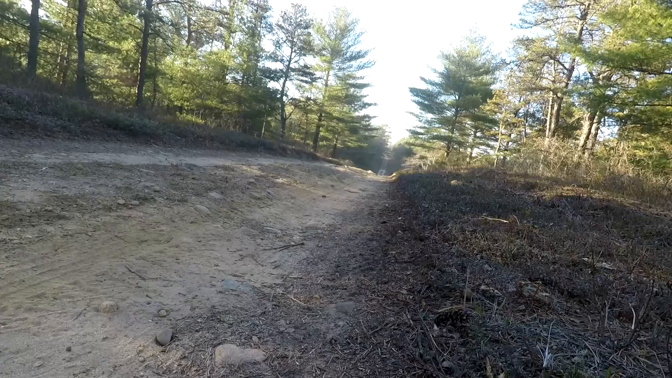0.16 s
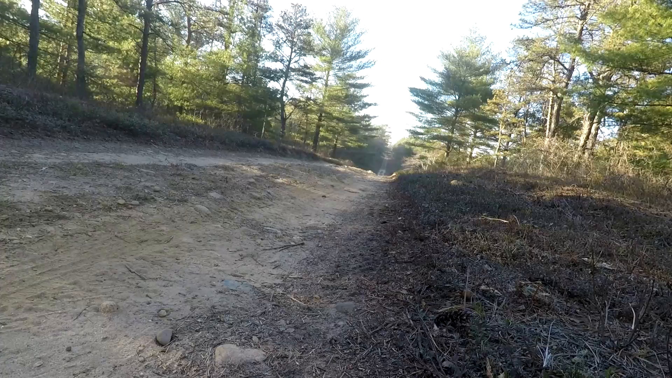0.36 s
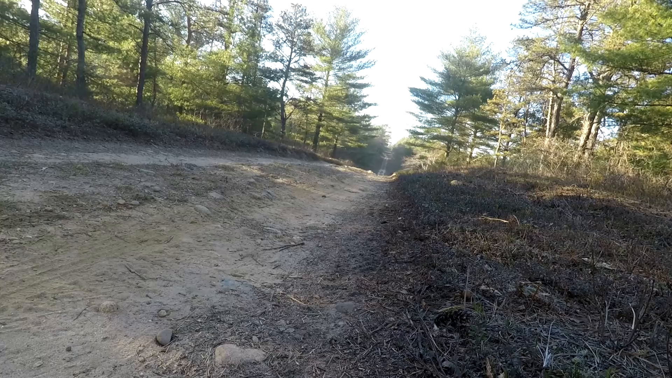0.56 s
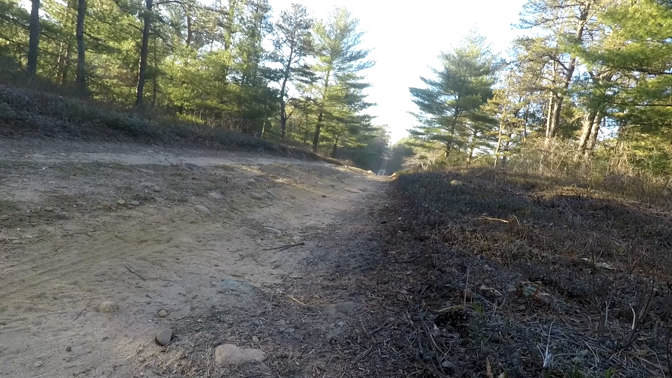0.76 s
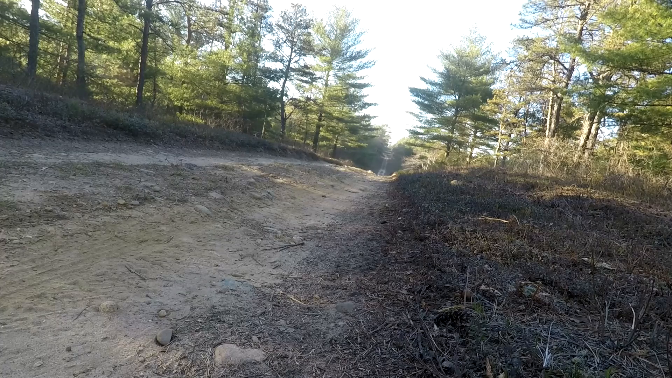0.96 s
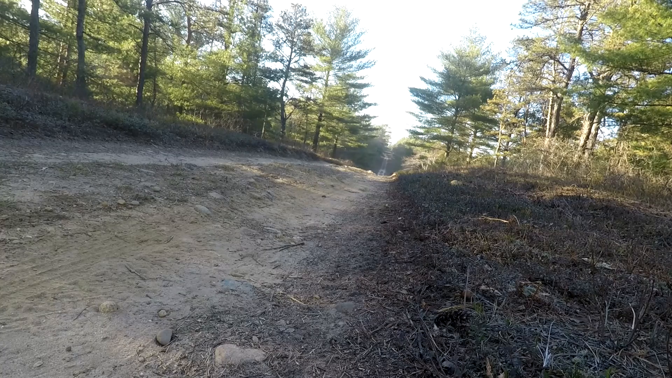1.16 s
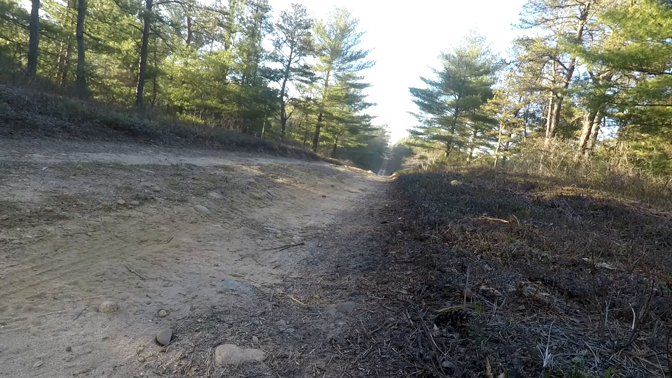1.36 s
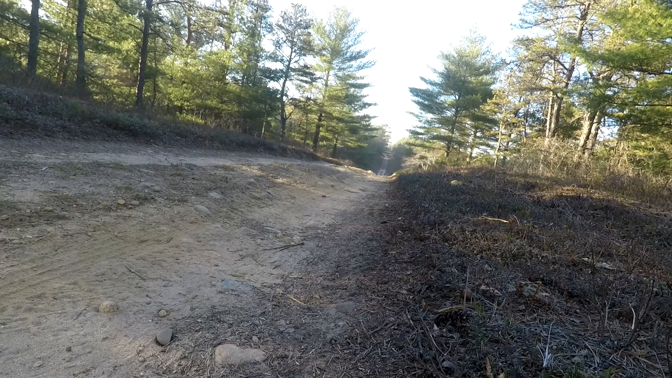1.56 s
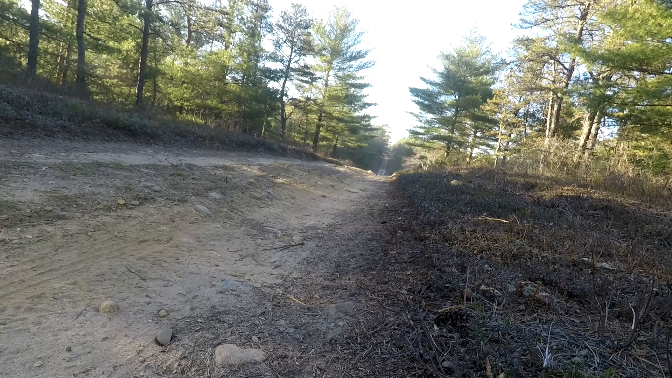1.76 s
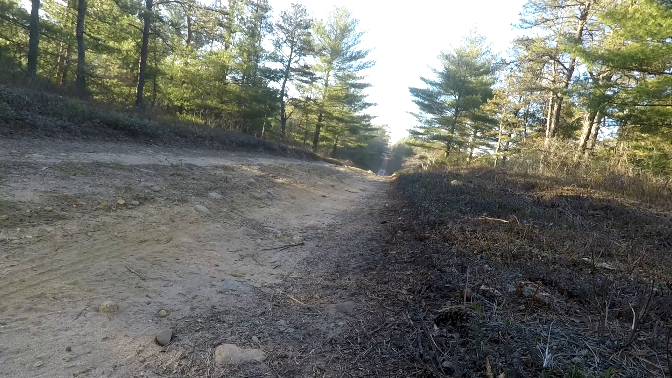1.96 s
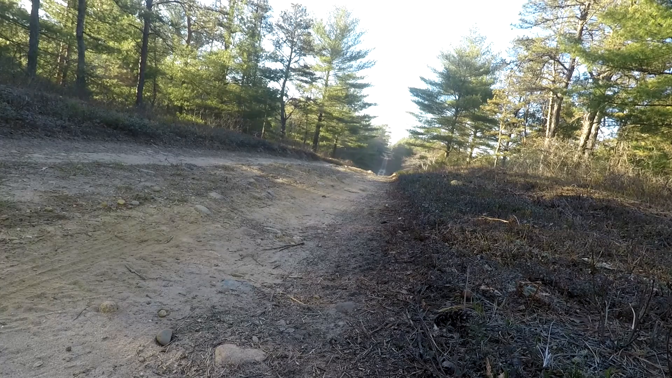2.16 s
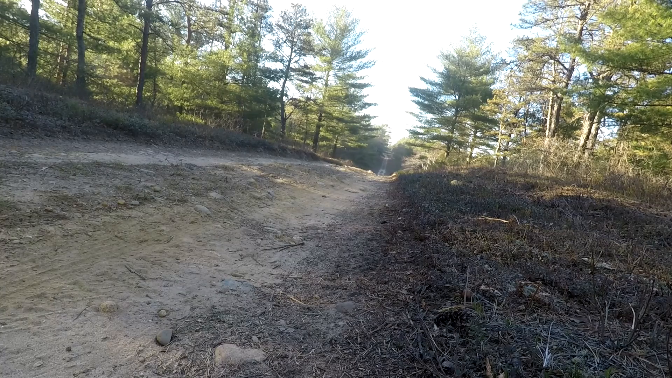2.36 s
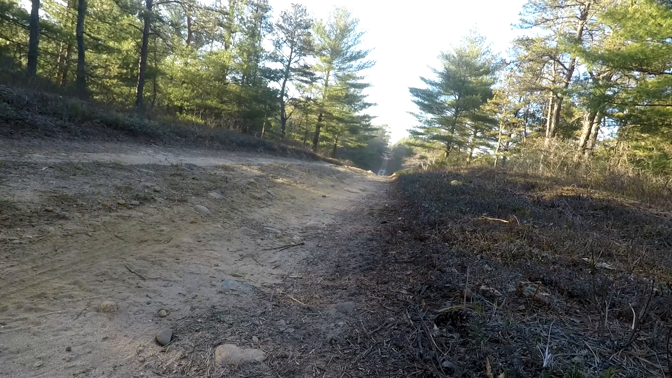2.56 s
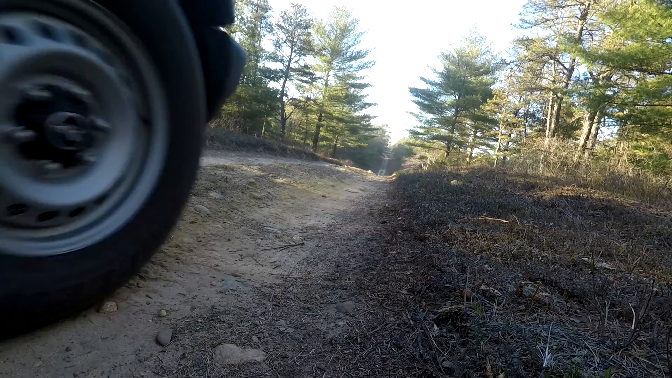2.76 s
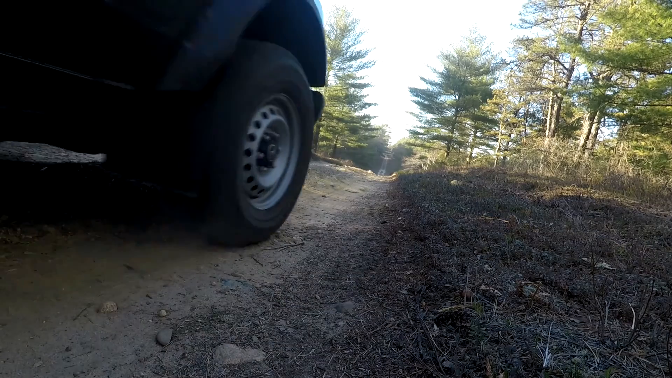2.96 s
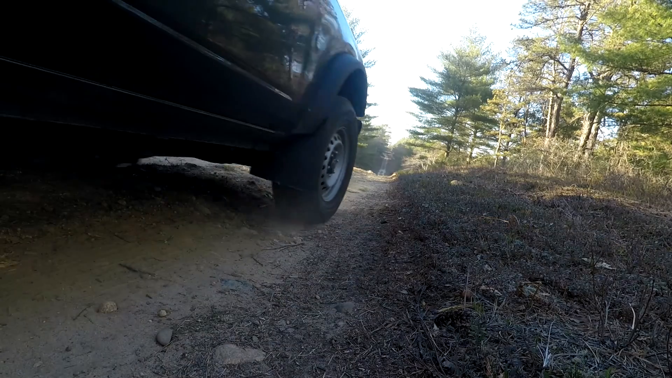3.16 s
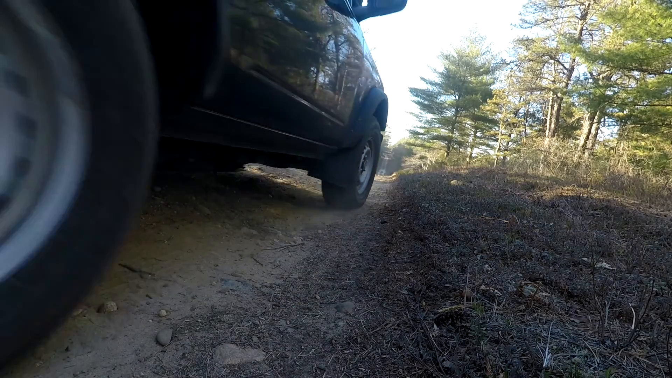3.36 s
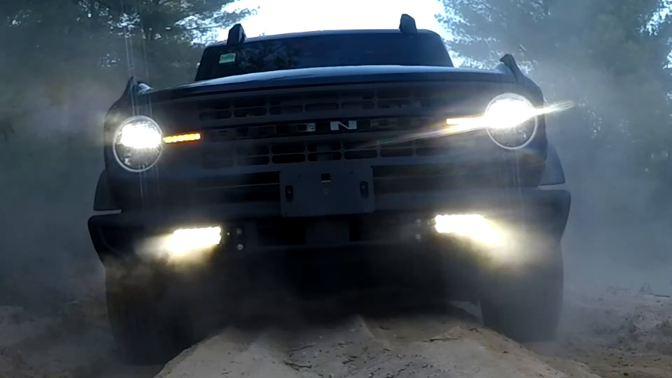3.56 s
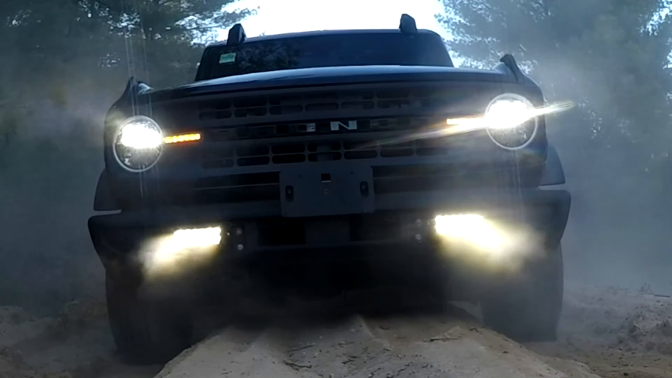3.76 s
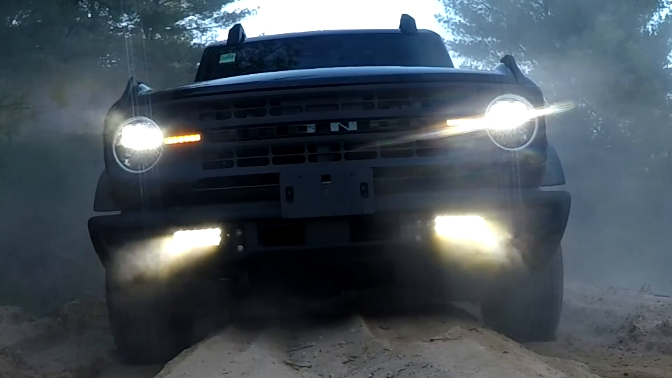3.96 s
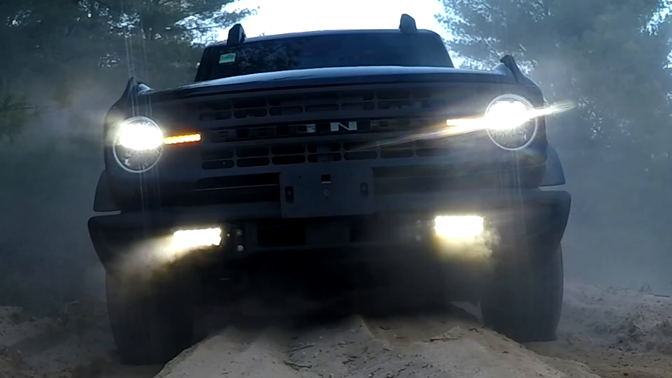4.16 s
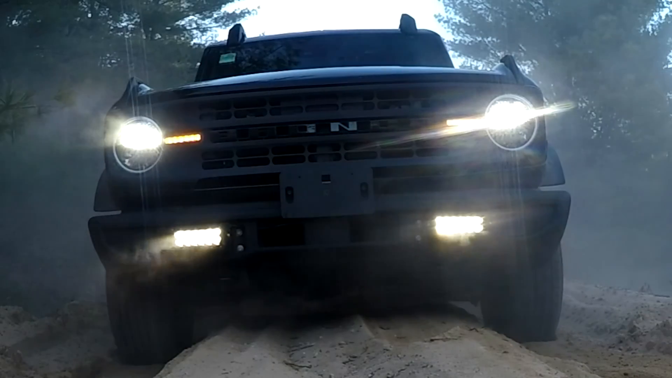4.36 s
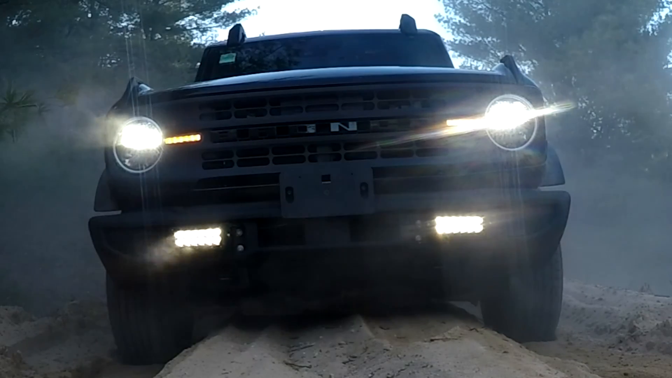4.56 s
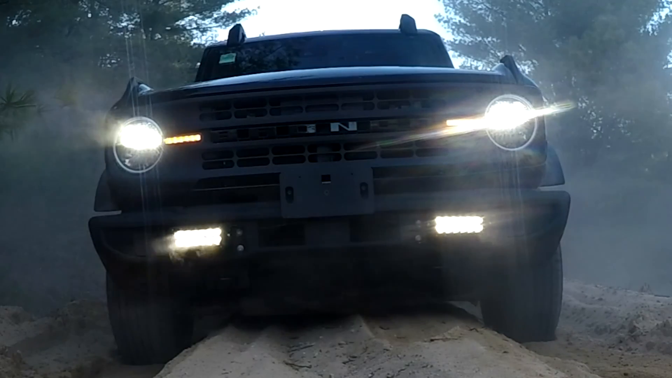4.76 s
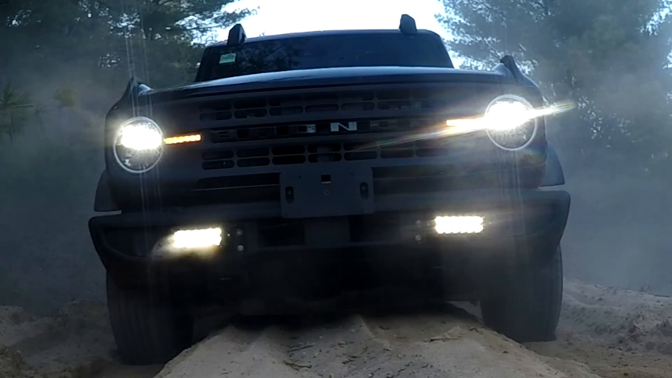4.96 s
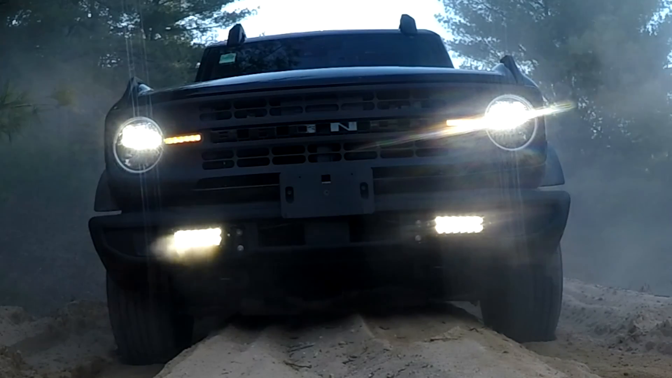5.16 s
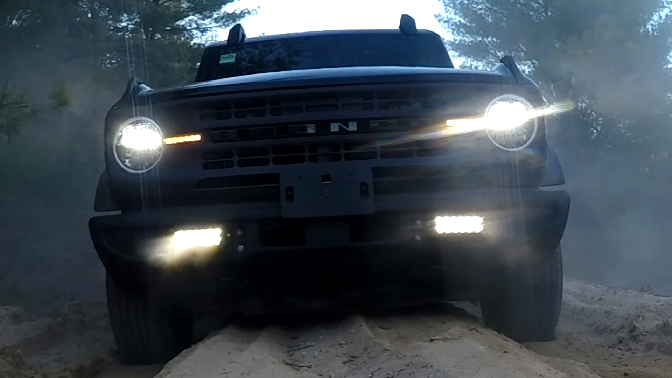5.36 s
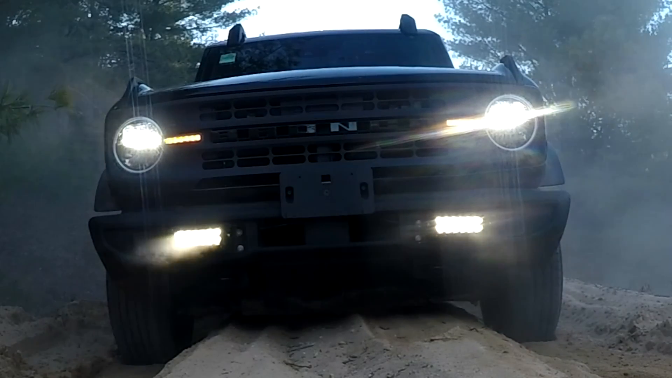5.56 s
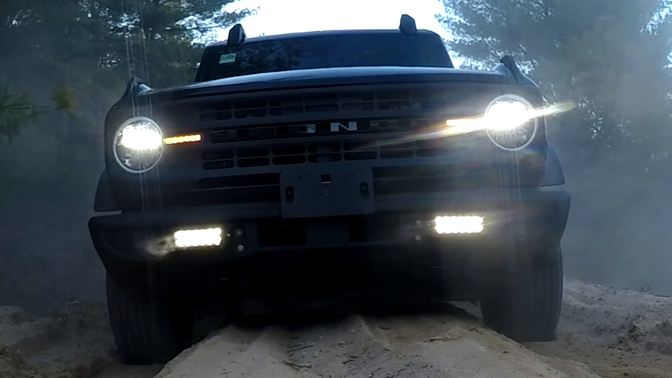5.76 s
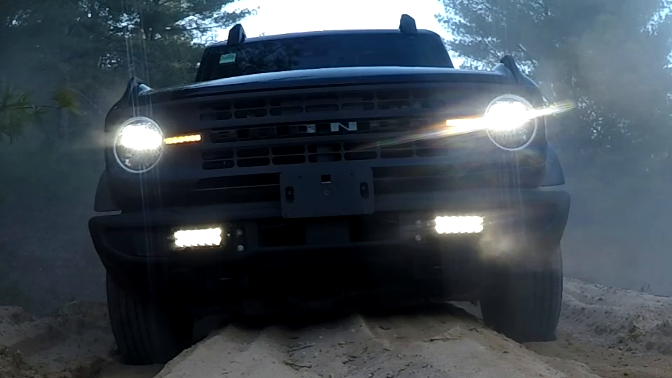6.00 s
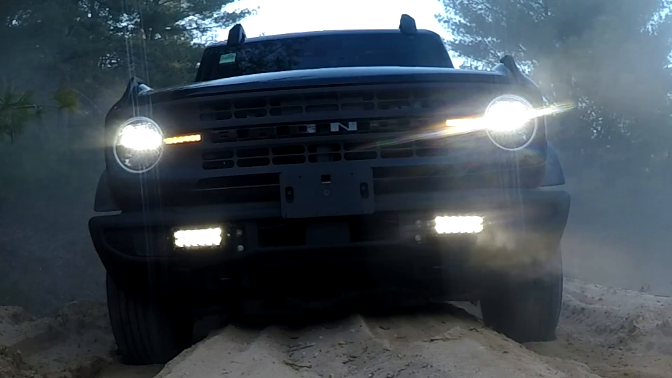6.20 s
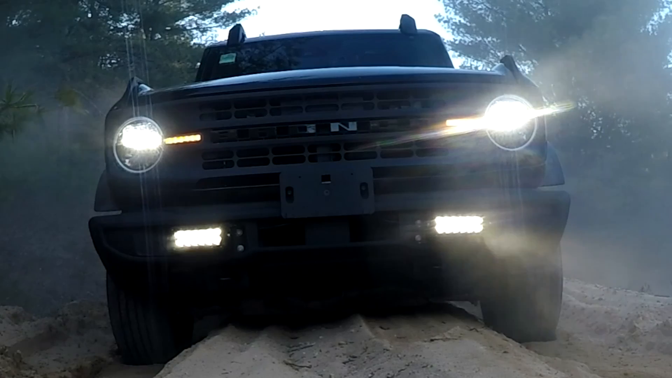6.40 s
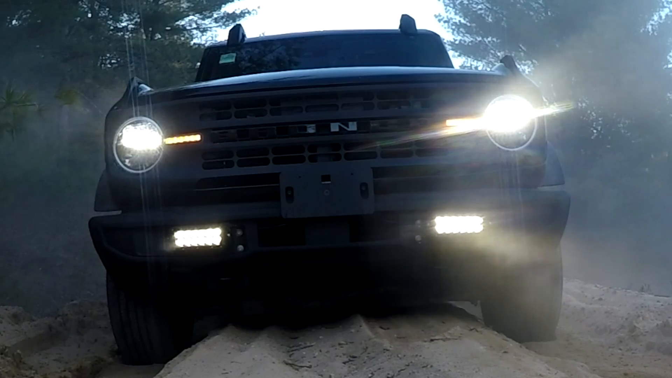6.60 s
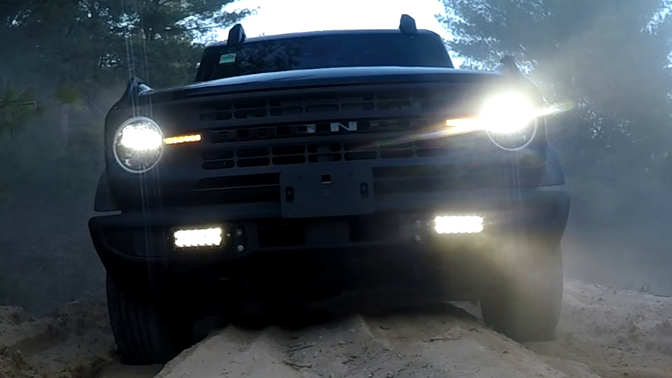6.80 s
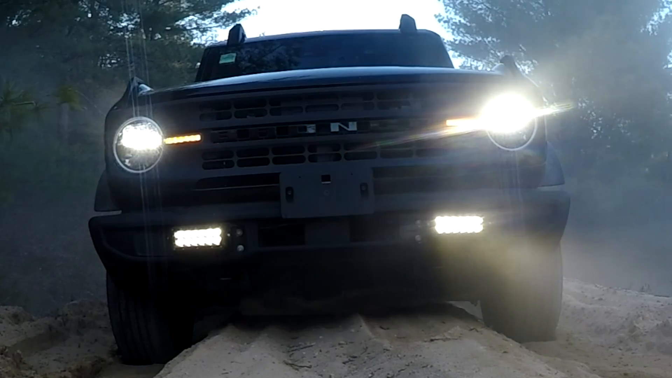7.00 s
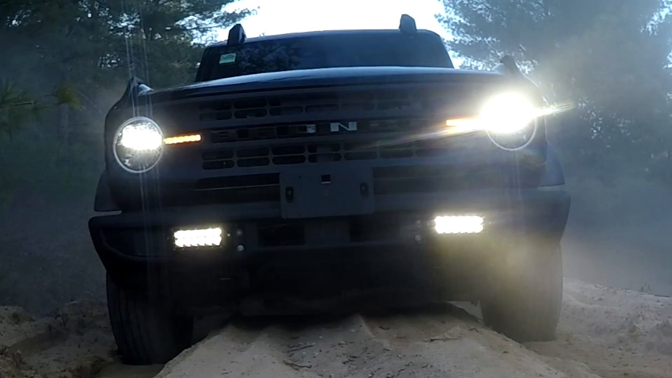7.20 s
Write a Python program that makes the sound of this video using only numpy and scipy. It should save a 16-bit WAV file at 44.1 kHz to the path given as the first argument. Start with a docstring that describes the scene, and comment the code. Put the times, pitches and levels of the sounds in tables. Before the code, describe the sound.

Ground-level stereo pickup beside a sandy trail, dry and outdoors. From 0 to 1.2 s a turbo truck creeps up with a quiet, low exhaust drone, its pitch sagging slightly, under faint air noise; a dull bump falls at 0.9 s. A tiny click at 1.2 s, then the throttle opens and revs and loudness climb steeply, nearly doubling in pitch by 1.6 s. There boost air vents in a bright, fluttering hiss that fades over about a second, with a deep short thump. From 1.7 s the loud, growling exhaust slides steadily down while engine and tyre rush is strongest around 2.7 s, then thins; a brief airy whistle shows near 2.2 s. At 3.46 s everything snaps off. After a very short silence, a much quieter steady idle runs to 7 s: slow low throbbing, wavering hums, soft fan noise, uneven injector ticks, and small bumps at 3.6, 3.8 and 4.1 s.

```python
"""A four-cylinder turbo truck creeps up a sandy trail, revs, vents its boost air and rolls past at
ground level while the revs sink: exhaust tones locked to the firings, over pulsing bands of noise.
The sound is cut off hard; after a very short silence the truck idles, heard from the front:
slow firing tones and hums over soft noise, with injector ticks made of ringing noise bands."""
import sys
import numpy as np
from scipy import signal
from scipy.fft import rfft, irfft, next_fast_len
from scipy.io import wavfile
from scipy.ndimage import uniform_filter1d

SR = 44100
rng = np.random.default_rng(int(sys.argv[2]) if len(sys.argv) > 2 else 0)


def transcribe(u):
    """Save the signal u as a 16-bit wav file named by the first command-line argument.

    u: samples, shape (n,) or (channels, n), limited to [-1, 1]; the rate is SR.
    q: integer samples, one column per channel.
    """
    v = np.clip(np.atleast_2d(u).T, -1, 1)
    q = np.round(v * 32767).astype(np.int16)
    wavfile.write(sys.argv[1], SR, q)


N = 319239
TIME = np.arange(N) / SR  # seconds
CUT_S, IDLE_START_S, FADE_IN_S = 3.459, 3.483, .018
VENT_S = 1.6  # the boost valve opens


def from_db(db):
    """Decibels to gain."""
    return 10 ** (np.asarray(db) / 20)


def rms_one(x):
    """Scales to rms 1."""
    return x / np.sqrt(np.mean(x ** 2) + 1e-20)


def in_time(rows):
    """Joins the points of a (seconds, value) curve by straight lines, sample by sample."""
    seconds, values = np.transpose(rows)
    return np.interp(TIME, seconds, values)


def at_hz(points, hz):
    """Reads a (Hz, value) curve on a log-frequency axis."""
    curve_hz, values = np.transpose(points)
    return np.interp(np.log(hz + 1), np.log(curve_hz), values)


def drift(rate):
    """Slow chance with spread 1, changing about rate times a second; made on a grid of 40 samples."""
    r = np.exp(-80 * np.pi * rate / SR)
    noise = rng.standard_normal(N // 40 + 2002)
    slow = signal.lfilter([1], [1, -2 * r, r * r], noise)[2000:]
    return np.interp(np.arange(N) / 40, np.arange(len(slow)), rms_one(slow))


def coloured(spectrum, envelope=1):
    """Two unrelated noises under an envelope, then filtered to the given spectrum; rms 1."""
    size = next_fast_len(N)
    gain = from_db(at_hz(spectrum, np.fft.rfftfreq(size, 1 / SR)))
    noise = rng.standard_normal((2, N)) * envelope
    return rms_one(irfft(rfft(noise, size) * gain, size)[:, :N])


def peak(hz, width):
    """Spectrum of one resonance with steep skirts, 9 dB down at one width either side."""
    below = [(hz / 4, -90), (max(hz - 3 * width, hz / 3), -30), (hz - width, -9)]
    above = [(hz + width, -9), (hz + 3 * width, -30), (hz * 4, -90)]
    return below + [(hz, 0)] + above


def puffs(cycles, depth, sharpness, uneven_db, cylinder_db=(0,)):
    """Envelope that swells once a firing; strength varies by cylinder and by chance."""
    firing = cycles.astype(int)
    chance_db = uneven_db * rng.standard_normal(1000)[firing]
    strength = from_db(chance_db + np.array(cylinder_db)[firing % len(cylinder_db)])
    return 1 + depth * strength * np.abs(np.sin(np.pi * cycles)) ** sharpness


def tone(cycles, order, waver_db, jitter):
    """One sine at a multiple of the cycles; both rows share a level waver, each has its own phase waver."""
    phase_waver = jitter * np.array([drift(6.8), 3 * drift(12.0)])  # radians
    phase = 2 * np.pi * order * cycles + phase_waver
    return np.sqrt(2) * from_db(waver_db * drift(6.8)) * np.sin(phase)


def burst(start, db, t60, hz):
    """A puff of noise around one pitch that rises in 4.4 ms and dies away by 60 dB in t60."""
    since = TIME - start
    level = from_db(db - 60 * np.maximum(since, 0) / t60)
    return level * np.clip(since / 0.0044, 0, 1) * coloured(peak(hz, 0.57 * hz))


# Creeping, throttle open, throttle shut.
# Each row: start in seconds, exhaust level at the start in dB, growth in dB per second.
STAGES = [(0, -39, 4), (1.175, -26, 19), (1.605, -25.5, -0.5)]
SWITCH_S = .02  # time to pass from one stage to the next


def by_stage(values, growth):
    """One value for each stage, growing in time, with a short glide between stages."""
    starts = np.array(STAGES)[:, 0]
    stage = np.clip(np.searchsorted(starts, TIME) - 1, 0, None)
    grown = np.array(values)[stage] + np.array(growth)[stage] * (TIME - starts[stage])
    return uniform_filter1d(grown, size=int(SWITCH_S * SR))


def ports(pair, side, balance, lagged):
    """Two microphone ports: the side is part mid copy, part phase-turned copy, part unrelated."""
    size = next_fast_len(N)
    hz = np.fft.rfftfreq(size, 1 / SR)
    mid, other = rfft(pair, size)
    side_gain = from_db(at_hz(side, hz))
    power_ratio = from_db(2 * at_hz(balance, hz))  # left over right
    copy = (power_ratio - 1) / (power_ratio + 1) * (1 + side_gain ** 2) / (2 * side_gain)
    copy = np.clip(copy, -.95, .95)
    turned = np.clip(at_hz(lagged, hz), 0, 1)
    rest = 1j * turned * mid + np.sqrt(1 - turned ** 2) * other
    across = side_gain * (copy * mid + np.sqrt(1 - copy ** 2) * rest)
    return irfft([mid + across, mid - across], size)[:, :N]


# The firing tone swelling and dipping. Each row: time in seconds, level in dB.
FIRING_LEVEL = [(0, -51), (.3, -39), (.85, -37.5), (.9, -32), (.96, -30), (1.16, -46), (1.25, -27.5),
                (1.38, -20.5), (1.5, -25.5), (1.62, -31.5), (1.69, -17.5), (2.35, -11), (3.46, -12.5)]
# Exhaust resonances and one null, met by the gliding orders.
# Each row: centre in Hz, half-width in Hz, lift at the centre in dB.
PIPE = [(171, 19, 1), (232.3, 12, -8), (269.7, 10.3, 10.5), (409, 17, 2.5), (508, 14, 5)]
# Orders against the exhaust level. Each row: multiple of the firing rate, level in dB while creeping,
# with throttle open and with throttle shut, growth in dB per second with throttle open, then shut.
LOW_ORDERS = [(.5, -14, -22, -19, 0, 7), (1.5, -21, -16, 3, -2, -12), (2, -8, 1.5, -5.5, -23, 5.5),
              (3, -9, -7.5, -17, -6, 10)]
# Higher orders. Each row: multiple of the firing rate, level in dB before the stage level below.
UPPER_ORDERS = [(2.5, -9), (3.5, 0), (4, -7), (4.5, -9), (5, -5), (6, -7), (7, -8), (8, -8)]
# All higher orders against the exhaust level. One value in dB per stage.
UPPER_STAGE_DB = [-16, -12, -8.5]


def exhaust_tones(hz, exhaust_db):
    """Orders of the firing rate, lifted as they cross pipe resonances; half orders: uneven cylinders."""
    cycles = np.cumsum(hz) / SR
    # The cut falls near a crest of the firing tone and snaps.
    cycles = cycles - cycles[int(CUT_S * SR)] + .25
    out = from_db(in_time(FIRING_LEVEL)) * tone(cycles, order=1, waver_db=.8, jitter=.12)
    upper = [(multiple, *(db + np.array(UPPER_STAGE_DB)), 0, -.3) for multiple, db in UPPER_ORDERS]
    for multiple, *stage_db, open_growth, shut_growth in LOW_ORDERS + upper:
        lift_db = sum(top_db / (1 + ((multiple * hz - centre) / width) ** 2)
                      for centre, width, top_db in PIPE)
        db = exhaust_db + by_stage(stage_db, [0, open_growth, shut_growth]) + lift_db
        out += from_db(db) * tone(cycles, multiple, waver_db=2.2, jitter=.22)
    return out


# Broad low exhaust noise. Each row: frequency in Hz, relative density in dB.
ROAR = [(15, -10), (30, -2), (60, 5), (130, 4), (260, 11), (400, 4.5), (600, -2), (900, -9.5), (1500, -73),
        (3000, -120)]


def exhaust_roar(cycles, exhaust_db):
    """Low noise at the exhaust level, puffing sharply with each firing."""
    envelope = puffs(cycles, depth=0.11, sharpness=5.5, uneven_db=2.5)
    return from_db(exhaust_db + 1.17 * drift(9.9)) * coloured(ROAR, envelope)


# Engine and tyre rush. Each row: frequency in Hz, relative density in dB.
ENGINE = [(290, -26), (500, -6), (661, -6), (1020, -3.5), (1550, -9), (2020, -11), (3200, -19), (4160, -47),
          (7040, -120)]


def engine_rush(cycles, rush_db):
    """Midrange engine and tyre noise, swelling gently with each firing as the truck passes."""
    envelope = puffs(cycles, depth=0.094, sharpness=1.6, uneven_db=5.0)
    return from_db(rush_db + 1.2 * drift(8.0)) * coloured(ENGINE, envelope)


# Colour of the exhaust pulses. Each row: frequency in Hz, gain in dB before levelling.
GROWL = [(200, -50), (330, -2), (500, 17.5), (650, -17.5), (800, 7), (1000, 6), (1300, -1.5), (1800, -32),
         (3000, -57)]
GROWL_UNDER_RUSH_DB = -9.5
SMEAR_S = 0.0086  # ground and underbody scatter each pulse over about this time


def pulses(cycles, spectrum, uneven_db, odd_db):
    """One click a firing, alternately weaker and stronger, scattered, coloured; each row has its own strengths."""
    size = next_fast_len(N)
    firing = cycles.astype(int)
    chance_db = uneven_db * rng.standard_normal((2, 1000))[:, firing]
    strength = from_db(chance_db + odd_db * (firing % 2))
    clicks = strength * (np.diff(firing, prepend=0) > 0)
    scatter = rng.standard_normal((2, 2000)) * np.exp(-np.arange(2000) / SR / SMEAR_S)
    gain = from_db(at_hz(spectrum, np.fft.rfftfreq(size, 1 / SR)))
    return rms_one(irfft(rfft(clicks, size) * rfft(scatter, size) * gain, size)[:, :N])


def exhaust_growl(cycles, rush_db):
    """Scattered exhaust pulses that swell with the rush."""
    level = from_db(rush_db + GROWL_UNDER_RUSH_DB + 2.75 * drift(10.0))
    return level * pulses(cycles, GROWL, uneven_db=2.0, odd_db=0.5)


HISS_UNDER_RUSH_DB, HISS_FLOOR_DB = -9.5, -50  # the hiss rides on the rush, over a steady floor
VENT_DB, VENT_FADE_S, VENT_OPENS_S = 13.5, 0.69, .015  # extra hiss, its fade and its opening time


def hiss_gain(rush_db):
    """Gain of the air hiss: it follows the rush and jumps when the boost is vented."""
    since = TIME - VENT_S
    opening = np.clip(since / VENT_OPENS_S + .5, 0, 1)
    vent_db = VENT_DB * np.exp(-np.maximum(since, 0) / VENT_FADE_S) * opening
    return np.hypot(from_db(rush_db + HISS_UNDER_RUSH_DB + vent_db), from_db(HISS_FLOOR_DB))


# Bright air noise. Each row: frequency in Hz, relative density in dB.
AIR = [(1290, -48), (2200, -4.5), (3510, -1.5), (4050, -1), (4830, -4), (5720, -5), (6560, -4.5),
       (7340, -6), (8280, -12.5), (9720, -14.5), (11100, -27.5), (12500, -25), (13700, -33), (15000, -60)]


def air_hiss(cycles, rush_db):
    """Treble noise from moving air, puffing with each firing and bursting out at the vent."""
    envelope = puffs(cycles, depth=0.2, sharpness=2.6, uneven_db=3.0)
    return hiss_gain(rush_db) * from_db(0.6 * drift(12)) * coloured(AIR, envelope)


BAND_WANDER = .015  # spread of each resonance's straying, as a share of its pitch


def wandering(hz, glide_hz, width):
    """A narrow band of noise whose centre glides after the vent opens and strays by chance."""
    since = np.maximum(TIME - VENT_S, 0)
    centre = (hz + glide_hz * since) * (1 + BAND_WANDER * drift(6))
    phase = 2 * np.pi * np.cumsum(centre) / SR
    r = np.exp(-2 * np.pi * width / SR)
    a, b = signal.lfilter([1], [1, -2 * r, r * r], rng.standard_normal((2, 2, N)))
    return rms_one(a * np.cos(phase) + b * np.sin(phase))


# Fluttering resonances in the air hiss. Each row: pitch in Hz as the valve opens,
# glide in Hz per second, width in Hz, level in dB against the hiss.
AIR_BANDS = [(2854, 0, 80, -12), (3230, 240, 160, -6.5), (5800, -130, 180, -9), (7250, -150, 240, -14)]


def air_resonances(rush_db):
    """Narrow bands that colour the hiss, each fluttering in level and straying in pitch."""
    bands = sum(from_db(db + 2.6 * drift(9)) * wandering(*band) for *band, db in AIR_BANDS)
    return hiss_gain(rush_db) * bands


# Low noise that differs between the ears. Each row: frequency in Hz, relative density in dB.
RUMBLE = [(15, -10), (35, -1), (60, -3), (100, -3), (140, -8), (250, -29), (800, -92)]


def rumble(db):
    """Lumpy low noise in opposite phase at the two ports."""
    return from_db(db + 2.0 * drift(6.4)) * coloured(RUMBLE)[0] * [[1], [-1]]


# Whines and whistling bands of air. Each row: middle in seconds, half length in seconds,
# level in dB, pitch in Hz, half-width in Hz.
WHINES = [(0.22, 0.16, -55, 2890, 25), (1.384, 0.13, -43, 1750, 60), (1.41, 0.085, -44.5, 2150, 80),
          (2.161, 0.1, -33.5, 1570, 90)]


def whines():
    """Narrow bands of noise that swell and fade, 8.2 dB down at each half length."""
    return sum(from_db(db - 8.2 * ((TIME - middle) / half) ** 2) * coloured(peak(hz, width))
               for middle, half, db, hz, width in WHINES)


# Dull bumps. Each row: start in seconds, level in dB, 60 dB decay in seconds, centre in Hz.
THUMPS = [(0.902, -24.5, 0.41, 166), (1.657, -11, 0.089, 69.5), (3.629, -24.5, 0.061, 89),
          (3.831, -33, 0.1, 249), (4.079, -31, 0.11, 148)]


def thumps(first_s, last_s):
    """The bumps starting between two times, each a decaying puff of low noise."""
    return sum(burst(*row) for row in THUMPS if first_s < row[0] < last_s)


# Click as the throttle opens: start in seconds, level in dB, 60 dB decay in seconds, centre in Hz.
VALVE_CLICK = (1.192, -41, .04, 7200)


def valve_click():
    """One short bright puff of noise."""
    return burst(*VALVE_CLICK)


# Engine speed: sags while creeping, climbs under throttle, sinks steadily after the lift.
# Each row: time in seconds, firings per second.
REVS = [(0, 90), (.39, 76), (.87, 74), (.95, 69.5), (1.17, 69), (1.25, 78.5), (1.35, 95.5), (1.56, 136),
        (1.68, 139), (2.05, 123.8), (2.55, 105.4), (3.08, 86.8), (3.46, 73.2)]
# Engine and tyre rush as the truck nears and passes. Each row: time in seconds, level in dB.
RUSH_LEVEL = [(0, -48.5), (1.17, -43.5), (1.53, -28.5), (1.58, -28.5), (1.62, -27.5), (2.4, -26),
              (2.7, -25.5), (3.05, -30), (3.4, -38.5)]
# Rumble at the start of each stage. One value in dB per stage.
DRIVE_RUMBLE_DB = [-42, -34, -31]
# Stereo width of the drive. Each row: frequency in Hz, side minus mid in dB.
DRIVE_SIDE = [(40, -29), (75, -21.5), (115, -17.5), (160, -15.5), (270, -2.5), (450, -6.5), (740, -1.5),
              (1220, -4), (2400, -1), (3300, -8), (4200, -7), (5500, -0.5), (7300, 5), (9500, 3.5),
              (15000, 1.5)]
# Stereo lean of the drive. Each row: frequency in Hz, left minus right in dB.
DRIVE_BALANCE = [(60, -2.5), (110, -1.5), (160, -8.5), (270, 6.5), (480, -11.5), (770, 0.5), (1200, 6.5),
                 (2740, 6), (4400, 1.5), (8120, -1.5), (15000, 2)]
# Phase spread of the drive. Each row: frequency in Hz, phase-turned share from 0 to 1.
DRIVE_LAGGED = [(100, 1), (300, 1), (600, 0.4), (1200, 0.8), (2500, 0.6), (5000, 0), (9000, .6)]


def drive():
    """Exhaust tones over roar, rush, growl and hiss, with whines, bumps and a click."""
    hz, rush_db = in_time(REVS), in_time(RUSH_LEVEL)
    cycles = np.cumsum(hz) / SR
    _, start_db, growth = np.transpose(STAGES)
    exhaust_db = by_stage(start_db, growth)
    out = exhaust_tones(hz, exhaust_db) + exhaust_roar(cycles, exhaust_db)
    out += engine_rush(cycles, rush_db) + exhaust_growl(cycles, rush_db)
    out += air_hiss(cycles, rush_db) + air_resonances(rush_db)
    out += whines() + thumps(0, CUT_S) + valve_click()
    low = rumble(by_stage(DRIVE_RUMBLE_DB, growth=[3, 3, 1.5]))
    return ports(out, DRIVE_SIDE, DRIVE_BALANCE, DRIVE_LAGGED) + low


# Firing tones at idle. Each row: multiple of the firing rate, level in dB.
IDLE_ORDERS = [(1, -36.5), (3, -44), (5, -58.5), (6, -57), (8, -57.5)]
TONE_LAG = .36  # delay of the idle tones, as a share of a firing


def idle_tones(cycles):
    """Slow firing tones, each wavering a little in level and phase."""
    return sum(from_db(db) * tone(cycles - TONE_LAG, multiple, waver_db=0.9, jitter=0.14)
               for multiple, db in IDLE_ORDERS)


# Steady-pitched hums beside the firing tones. Each row: pitch in Hz, level in dB.
HUMS = [(59.3, -46.5), (121, -58), (278, -58.5)]


def hums():
    """Tones at fixed pitches, free of the firings and wavering widely in level."""
    return sum(from_db(db) * tone(TIME, hz, waver_db=4.5, jitter=0.6) for hz, db in HUMS)


# Low idle noise. Each row: frequency in Hz, relative density in dB.
IDLE_LOW = [(18, 1), (35, -14), (60, -11.5), (95, -3), (190, -8.5), (290, -6.5), (440, -12.5), (610, -23),
            (770, -27.5), (930, -22.5), (1300, -68), (2500, -110)]
# High idle noise. Each row: frequency in Hz, relative density in dB.
IDLE_HIGH = [(410, -55), (700, -12), (1310, -5.5), (1700, -3.5), (1900, -4), (2560, -12.5), (3390, -14.5),
             (3760, -7.5), (4920, -19), (5810, -15.5), (8000, -21.5), (9820, -22), (13700, -34),
             (15000, -47)]
IDLE_LOW_DB, IDLE_HIGH_DB = -42.5, -50.5


def fan_and_intake(cycles):
    """Low noise that puffs with each firing, under steady high noise."""
    envelope = puffs(cycles, depth=0.5, sharpness=2.7, uneven_db=3.0)
    low = from_db(IDLE_LOW_DB) * coloured(IDLE_LOW, envelope)
    return low + from_db(IDLE_HIGH_DB) * coloured(IDLE_HIGH)


# Ringing of the block. Each row: pitch in Hz, half-width in Hz, level in dB, tick depth as a ratio.
CLATTER = [(1706, 115, -55, 1.2), (3540, 1200, -63.5, 2), (5780, 440, -62.5, 8.1), (7130, 480, -70, 1.6),
           (9560, 510, -71, 1.2)]
# Strength of the tick. One value in dB per cylinder, in firing order.
CYLINDER_DB = [-3, -5, -7, 0]
TICK_UNEVEN_DB = 1.4  # chance spread of the injector ticks


def injector_ticks(cycles):
    """A sharp noise swell each firing, uneven between cylinders, rings in the block's resonances."""
    out = 0
    for hz, width, db, depth in CLATTER:
        envelope = puffs(cycles, depth, 8.3, TICK_UNEVEN_DB, CYLINDER_DB)
        out += from_db(db) * coloured(peak(hz, width), envelope)
    return out


# Stereo width at idle. Each row: frequency in Hz, side minus mid in dB.
IDLE_SIDE = [(40, -19), (99, -15), (170, -5), (270, -7.5), (450, -3), (740, 9), (1220, 2.5), (1750, -8),
             (2700, 0), (3600, -8), (4300, -19), (5200, -2), (5800, -5), (6600, -0.5), (15000, -1)]
# Stereo lean at idle. Each row: frequency in Hz, left minus right in dB.
IDLE_BALANCE = [(60, -2), (110, -2.5), (380, 2.5), (1290, -1.5), (2380, 2), (8000, -2.5)]
# Phase spread at idle. Each row: frequency in Hz, phase-turned share from 0 to 1.
IDLE_LAGGED = [(100, 0.85), (300, 0.6), (5000, .6)]
IDLE_HZ, IDLE_RUMBLE_DB = 28.455, -51.5  # firings per second; rumble level


def idle():
    """Firing tones, hums, fan and intake noise, injector ticks and a few bumps."""
    cycles = IDLE_HZ * TIME + .22
    out = idle_tones(cycles) + hums() + fan_and_intake(cycles) + injector_ticks(cycles)
    out += thumps(CUT_S, np.inf)
    return ports(out, IDLE_SIDE, IDLE_BALANCE, IDLE_LAGGED) + rumble(IDLE_RUMBLE_DB)


def scene():
    """The drive stops dead at the cut; the idle fades in just after."""
    fade_in = np.clip((TIME - IDLE_START_S) / FADE_IN_S, 0, 1)
    return drive() * (TIME < CUT_S) + idle() * fade_in


def record(dry):
    """A steep low-pass takes off the top above 15.8 kHz."""
    return signal.sosfilt(signal.cheby2(12, 70, 15800, fs=SR, output="sos"), dry)


dry = scene()
out = record(dry)
transcribe(out)
```